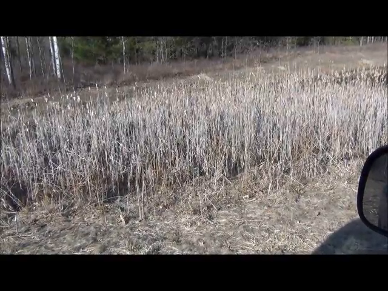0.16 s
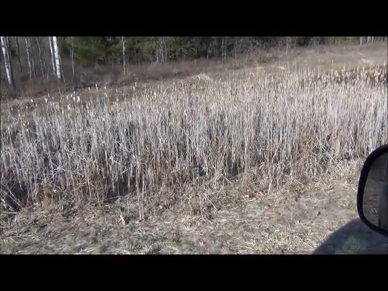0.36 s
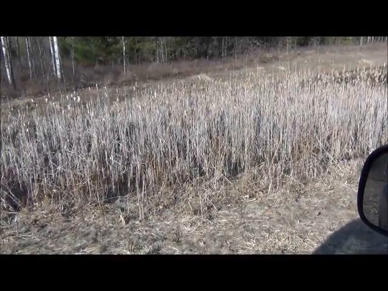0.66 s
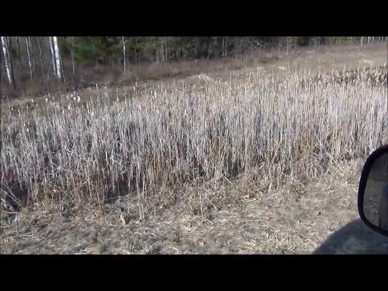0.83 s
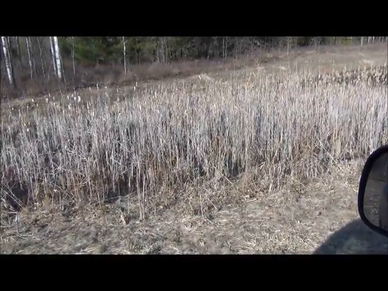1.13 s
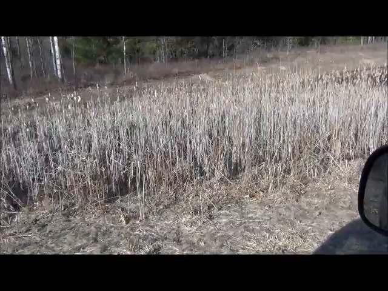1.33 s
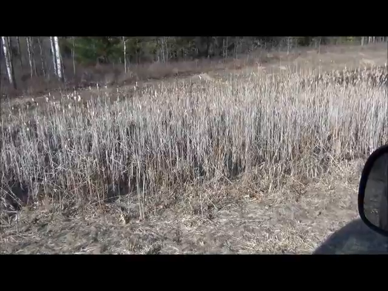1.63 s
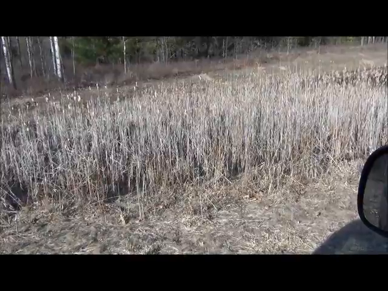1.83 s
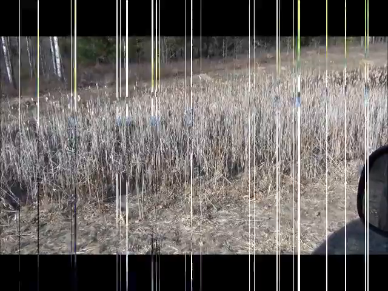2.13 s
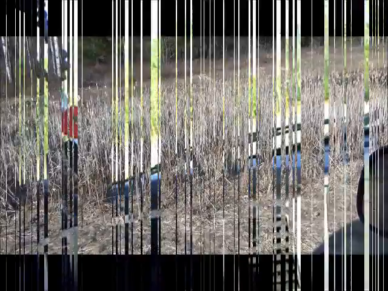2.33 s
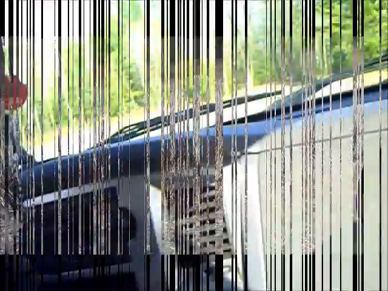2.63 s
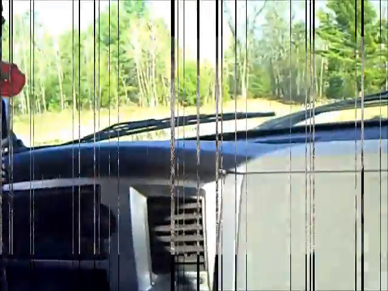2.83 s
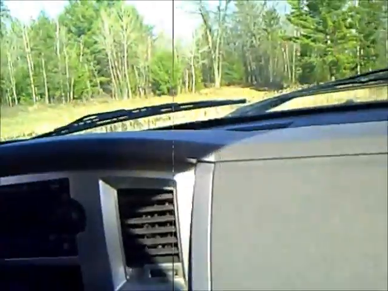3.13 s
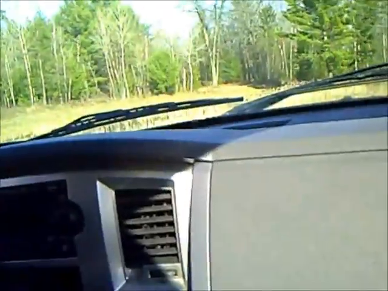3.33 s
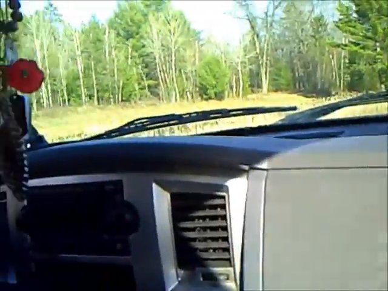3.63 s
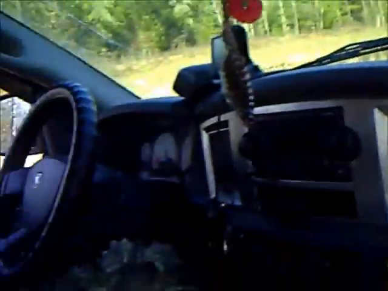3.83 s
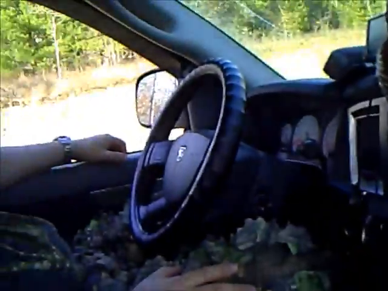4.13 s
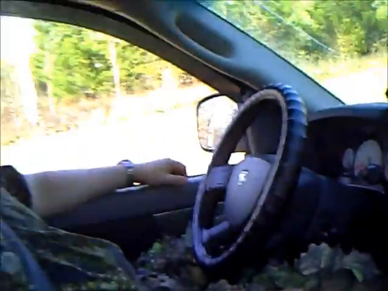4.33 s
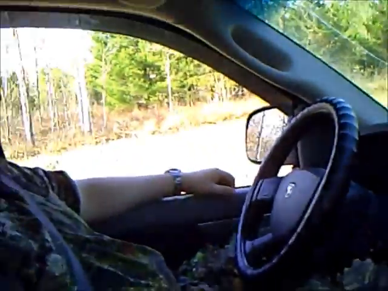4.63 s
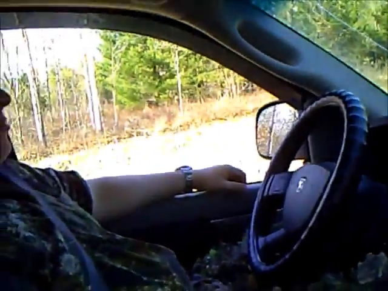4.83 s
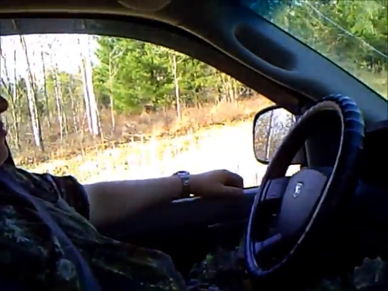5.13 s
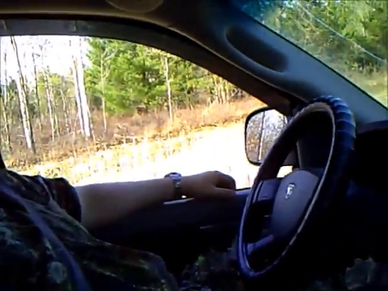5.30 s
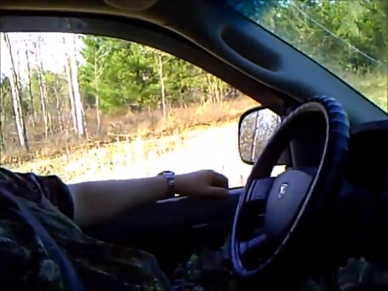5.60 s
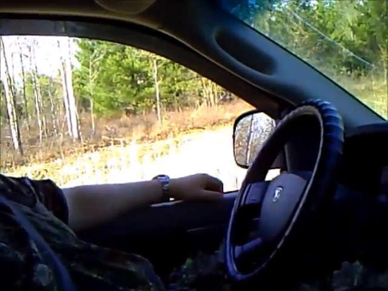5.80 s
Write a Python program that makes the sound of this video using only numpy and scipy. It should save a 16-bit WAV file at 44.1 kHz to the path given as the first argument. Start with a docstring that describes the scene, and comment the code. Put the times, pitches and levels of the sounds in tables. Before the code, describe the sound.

A small camera at a parked truck hears a bright, crowded peeper chorus with a thin outdoor echo and light hiss. An accelerating-in-loudness, climbing trill opens it, and another follows later. One hard click interrupts, then clothing brushes nearby. The sound suddenly drops to a quiet, narrow cab interior, where distant peeps remain faint beneath dull irregular handling taps and tiny creaks.

```python
"""In a cattail marsh, spring peepers call, heard with a small camera from a parked pickup.
Each peep is a rising harmonic glide from a vocal sac; trills are runs of tiny peeps, and birds whistle and chip.
Hundreds of overlapping peeps with decaying echoes blur into a crowd; filtered noise makes hiss and follows the calls.
An electrical step clicks, shaped noise makes cloth strokes, and filtered pulses make handling knocks.
After a faint buzz begins, the chorus drops abruptly and is heard faintly inside the cab, among soft knocks."""
import sys
import numpy as np
from scipy import signal
from scipy.fft import rfft, irfft
from scipy.io import wavfile
from scipy.ndimage import uniform_filter1d

SR = 44100
rng = np.random.default_rng(int(sys.argv[2]) if len(sys.argv) > 2 else 0)


def store_pcm(level_fs):
    """Save levels as 16-bit WAV."""
    pcm = np.round(np.clip(level_fs, -1, 1) * 32767).astype(np.int16)
    wavfile.write(sys.argv[1], SR, np.atleast_2d(pcm).T)


N = 262924
TIME = np.arange(N) / SR
CUT_S = 3.354  # the marsh gives way to the cab
PEEP_ARCH_HZ = 13.7  # peep glides flatten a little towards their end
# small frogs call higher, and each size sweeps at its own speed:
# (middle pitch [Hz], rise [Hz/s], overtone offset [dB])
FROG_SIZES = [(2740, 3750, -38.5), (2953, 3020, -29), (3018, 2435, -32.5), (3151, 3600, -30.5),
              (3354, 5700, -24), (3480, 4800, -33)]


def undb(db):
    """Logarithmic level: decibels become an amplitude ratio."""
    return 10 ** (np.asarray(db) / 20)


def unit(x):
    """Power normalization: scale to rms 1."""
    return x / np.sqrt(np.mean(x ** 2) + 1e-20)


def add(track, start_s, x):
    """Superposition: mix x into the track from start_s."""
    i = int(round(start_s * SR))
    x = x[max(-i, 0):max(N - i, 0)]
    track[max(i, 0):max(i, 0) + len(x)] += x


def colour(x, points):
    """Linear filtering: weight the spectrum by (frequency [Hz], gain [dB]) points."""
    point_hz, gain_db = np.transpose(points)
    hz = np.maximum(np.fft.rfftfreq(len(x), 1 / SR), 1)
    gain = undb(np.interp(np.log(hz), np.log(point_hz), gain_db))
    return irfft(rfft(x) * gain, len(x))


def noise(points):
    """Broadband noise: filtered Gaussian samples scaled to rms 1."""
    return unit(colour(rng.standard_normal(N), points))


def ring(x, hz, width_hz):
    """Resonance: one mode passes a band around its natural frequency."""
    b, a = signal.iirpeak(min(hz, .45 * SR), hz / width_hz, fs=SR)
    return signal.lfilter(b, a, x)


def wander(t, rate_hz):
    """Random modulation: Gaussian values, rate_hz of them a second, joined by lines."""
    points = rng.standard_normal(int(t[-1] * rate_hz) + 2)
    return np.interp(t * rate_hz, np.arange(len(points)), points)


def note(length_s, start_hz, end_hz, arch_hz, partials,
         edge_s=0.0049, waver_hz=10, shimmer_db=1.7, hook_hz=0):
    """Frequency modulation: a gliding harmonic tone of rms near 1, with an optional falling hook."""
    t = np.arange(int((length_s + edge_s / 2) * SR)) / SR
    u = t / length_s
    hz = start_hz + (end_hz - start_hz) * u + 4 * arch_hz * u * (1 - u)
    hz = hz + hook_hz * np.exp(-t / 0.0049) + waver_hz * wander(t, 260)
    phase = 2 * np.pi * np.cumsum(hz) / SR + 4 * np.pi * rng.random()
    edges = np.clip(np.minimum(t, t[-1] - t) / edge_s, 0, 1)
    swell = np.sin(np.pi / 2 * edges) ** 2
    tone = np.zeros(len(t))
    for multiple, db in partials:
        half = round(2 * multiple)
        flutter_db = 2.5 * wander(t, 320) if half != 2 else 0  # the main tone holds
        tone += undb(db + flutter_db) * np.sin(half / 2 * phase)
    return np.sqrt(2) * tone * swell * undb(shimmer_db * wander(t, 120))


def frog(overtone_db):
    """Source and resonator: the sac rings at twice the cord rate, and cord harmonics leak past it."""
    # tone of the sac: (multiple of the whistled pitch, relative level [dB])
    sac = [(1, 0), (2, -51)]
    # harmonics of the vocal cords: (multiple of the whistled pitch, relative level [dB])
    cords = [(.5, -2), (1.5, -2), (2, -13.5), (2.5, -18.5), (3, -20), (4, -25), (4.5, -26)]
    return sac + [(multiple, db + overtone_db) for multiple, db in cords]


def peeps(overtone_spread_db=1.5):
    """Size scaling: each nearer frog's peep is one upward glide whose steepness follows its pitch."""
    # peeps that stand out of the chorus: (time [s], length [s], middle pitch before the arch [Hz], level [dB])
    calls = [(0, 0.01, 3056, -23), (0, 0.029, 2819, -28), (0.051, .13, 2970, -33.5),
             (0.224, 0.081, 2958, -31), (.243, .04, 3490, -46), (0.308, 0.077, 3230, -42.5),
             (0.313, 0.063, 2948, -30), (.477, .11, 3000, -30), (.488, .077, 2734, -28),
             (0.599, 0.063, 3042, -29.5), (0.612, .13, 2998, -33.5), (.638, 0.073, 3162, -39.5),
             (0.738, .091, 2903, -40), (0.866, 0.08, 2928, -29), (0.917, 0.085, 2990, -34.5),
             (.95, 0.079, 2748, -28), (.954, 0.068, 2937, -32.5), (1.051, 0.059, 2750, -40),
             (1.111, 0.043, 3440, -45.5), (1.187, .06, 2706, -45), (1.252, 0.078, 2917, -33),
             (1.257, 0.074, 3233, -38), (1.267, 0.033, 2768, -29), (1.34, 0.1, 3015, -28.5),
             (1.357, 0.039, 3265, -38.5), (1.369, .1, 2786, -28), (1.496, 0.066, 2946, -29.5),
             (1.592, 0.043, 3476, -46), (1.627, 0.051, 3060, -43.5), (1.709, 0.063, 2780, -38),
             (1.782, 0.044, 2935, -31), (1.831, 0.081, 2768, -28), (1.887, 0.061, 3313, -38),
             (1.911, 0.044, 2990, -32), (1.938, 0.06, 3117, -36.5), (1.947, 0.11, 2997, -30.5),
             (1.99, 0.065, 2929, -32.5), (2.069, 0.049, 3445, -44.5), (2.161, 0.058, 2903, -31.5),
             (2.252, 0.083, 2882, -33.5), (2.339, 0.088, 2783, -26.5), (2.356, 0.053, 2933, -27.5),
             (2.426, 0.12, 2987, -33), (2.434, 0.082, 2813, -28), (2.547, 0.096, 3153, -34.5),
             (2.557, 0.038, 3490, -46), (2.598, .049, 3347, -37.5), (2.734, 0.1, 2994, -31.5),
             (2.81, 0.078, 2927, -29.5), (2.835, 0.073, 2760, -28.5), (2.901, .075, 2966, -31),
             (2.956, .08, 2930, -33.5), (3.049, 0.07, 3019, -32), (3.177, .043, 3275, -36.5),
             (3.189, 0.0696, 3015, -37.5), (3.202, 0.075, 3333, -37.5), (3.28, .072, 2904, -27.5),
             (3.388, 0.078, 2970, -48), (3.431, 0.04, 3224, -50.5), (3.512, 0.042, 2860, -55),
             (3.575, 0.014, 3060, -52), (3.613, 0.09, 2810, -60.5), (3.776, 0.038, 2730, -55.5),
             (3.957, 0.05, 3050, -47.5), (4.014, 0.036, 2880, -49.5), (4.116, .063, 2860, -55.5),
             (4.208, 0.059, 2735, -51), (4.301, 0.06, 2864, -49.5), (4.415, 0.076, 3150, -47.5),
             (4.56, 0.071, 2947, -51.5), (4.667, 0.066, 3320, -56.5), (4.69, 0.088, 2938, -55),
             (4.802, 0.068, 3125, -47), (4.813, 0.048, 2900, -52.5), (5.048, 0.048, 2900, -50),
             (5.136, 0.054, 2710, -52), (5.23, .045, 2900, -49.5), (5.281, 0.047, 3122, -42.5),
             (5.301, 0.041, 3410, -52.5), (5.48, 0.048, 2910, -47.5), (5.655, 0.056, 3116, -45),
             (5.754, 0.064, 2954, -52), (5.933, .034, 2857, -50.5)]
    out = np.zeros(N)
    pitches, rises, overtones = np.transpose(FROG_SIZES)
    for start_s, length_s, hz, db in calls:
        climb = np.interp(hz, pitches, rises) * length_s
        overtone_db = np.interp(hz, pitches, overtones) + overtone_spread_db * rng.standard_normal()
        peep = note(length_s, hz - climb / 2, hz + climb / 2, PEEP_ARCH_HZ, frog(overtone_db))
        add(out, start_s, undb(db) * peep)
    return out


def neighbours(count=6, low_hz=2760, high_hz=3290, period_s=.46, drift_s=.035, length_s=.06, spread_db=2.5):
    """Near-periodic calling: frogs at middle distance repeat about twice a second, each near its own pitch."""
    out = np.zeros(N)
    pitches, rises, _ = np.transpose(FROG_SIZES)
    for own_hz in np.linspace(low_hz, high_hz, count):
        climb, first = np.interp(own_hz, pitches, rises) * length_s, rng.random()
        for k, (late, off, loud) in enumerate(rng.standard_normal(size=(16, 3))):
            hz = own_hz + 25 * off
            peep = note(length_s, hz - climb / 2, hz + climb / 2, PEEP_ARCH_HZ, frog(overtone_db=-29.5))
            start_s = (k + first - 1) * period_s + drift_s * late
            add(out, start_s, undb(spread_db * loud) * peep)
    return out


def scatter(x, t60_s, wet_db):
    """Reverberation: reeds, trees and the truck return a thin, exponentially decaying tail."""
    t = np.arange(SR // 2) / SR
    decay = undb(-60 * t / t60_s)
    tail = rng.standard_normal(len(t)) * decay * (t > .006)  # first echo after 6 ms
    return undb(wet_db) * signal.fftconvolve(x, tail / np.linalg.norm(tail))[:N]


def crowd(count=560, spread_db=2.5):
    """Superposition and scattering: hundreds of peeps of varied pitch and level blur through the reeds."""
    out = np.zeros(N)
    for k, (when, pitch, span, rise) in enumerate(rng.random((count, 4))):
        hz = 2480 + 880 * pitch
        end_hz = hz + 110 + 160 * rise
        peep = note(.04 + 0.046 * span, hz, end_hz, 9.6, frog(overtone_db=-34.5))
        start_s = (k + when) / count * (N / SR + .1) - .1
        add(out, start_s, undb(spread_db * rng.standard_normal()) * peep)
    return undb(-7.5) * out + scatter(out, t60_s=.25, wet_db=1.5)


def following_noise(x, level_db):
    """Envelope modulation: faint noise, mostly around the peeps' pitch, rises and falls with the chorus."""
    loudness = np.sqrt(np.abs(uniform_filter1d(x ** 2, size=500)))
    flutter = undb(3 * np.clip(wander(TIME, 110), -1.6, 1.6))
    skirt = noise([(200, -15.5), (1150, -16.5), (1500, -1.5), (1900, 0.5), (2500, 8), (3400, -2),
                   (3900, -4.5), (4500, 0.0), (5200, -25.5), (9000, -17.5), (12000, -36)])
    return undb(level_db) * loudness * flutter * skirt


def open_marsh(near, middle, far):
    """Spectral and level shaping: calls over the marsh, the farther ones swelling and ebbing."""
    # colour of the crowd over the marsh: (frequency [Hz], relative level [dB])
    crowd_colour = [(2400, -13), (2650, -7), (2850, -2), (3050, 2.5), (3200, -12), (3400, -14.5),
                    (3700, -13.5), (4300, -2), (6000, -5)]
    # swell of the farther frogs: (time [s], relative level [dB])
    swell = [(0.0, -31.5), (0.53, -32), (0.67, -37), (1.09, -37.5), (1.93, -36), (2.04, -40), (2.25, -39),
             (2.39, -33), (2.81, -34), (2.94, -34), (3.19, -34), (3.25, -36)]
    chorus = undb(-5.0) * unit(colour(far, crowd_colour)) + undb(-6.5) * colour(middle, crowd_colour)
    return near + chorus * undb(np.interp(TIME, *np.transpose(swell)))


def heard_outside(marsh):
    """Superposition: direct calls, echoes and a faint noise that follows them add to a steady hiss."""
    # still air and microphone hiss: (frequency [Hz], relative level [dB])
    air = [(25, 0), (90, 1), (200, -5), (500, -4), (1000, -8.5), (2000, -3), (4000, -8.5), (8000, -20.5),
           (15000, -25)]
    hiss = undb(-61) * noise(air)
    echoes = scatter(marsh, t60_s=0.45, wet_db=-12.0)
    return marsh + echoes + following_noise(marsh, level_db=-29.5) + hiss


def birds():
    """Frequency glides: whistles, some steady, some hooked and quavering, and short bright chips."""
    # low whistles: (nominal time [s], length [s], start [Hz], end [Hz], arch [Hz],
    # level before the partials' gain [dB], quaver [0-1])
    whistles = [(0.883, 0.084, 2176, 2103, -42, -56.5, 0.14), (2.076, 0.063, 2170, 2097, -15, -59, 0.1),
                (2.47, 0.076, 2160, 2210, -42, -63, 0.3), (2.77, 0.066, 2150, 2107, -34, -58, 0.2),
                (2.957, 0.092, 2180, 2096, -21, -65.5, 0.3), (3.956, .12, 2390, 2350, -13, -63.5, 0.96),
                (4.41, 0.14, 2360, 2480, -53, -64, 1), (4.87, 0.092, 2446, 2390, -40, -59.5, 0.87),
                (5.442, 0.12, 2364, 2378, 3, -57.5, 0.92), (5.79, 0.19, 2260, 2450, 47, -65, 0.9)]
    # sharp falling chips: (time [s], length [s], start [Hz], end [Hz], arch [Hz],
    # level before the partials' gain [dB])
    chips = [(0.052, 0.037, 1890, 1714, -10, -56.5), (0.591, 0.043, 1858, 1713, 9, -57),
             (1.053, 0.04, 1864, 1750, -10, -58), (2.321, 0.037, 1857, 1756, -11, -58),
             (2.913, 0.041, 1830, 1754, 9, -57), (3.535, 0.018, 1790, 1690, 2, -73),
             (4.978, 0.017, 1730, 1650, -2, -73), (5.564, 0.02, 1820, 1770, 6, -78)]
    # partials of either voice: (multiple of the whistled pitch, gain [dB])
    whistle_tone = [(1, 7.5), (2, -43)]
    chip_tone = [(1, 1.5), (2, 4.5), (3, -9.5), (4, -8.5), (5, -14.5), (6, -15.5)]
    out = np.zeros(N)
    for start_s, *glide, db, quaver in whistles:
        whistle = note(*glide, whistle_tone, edge_s=0.0076, waver_hz=32 * quaver,
                       shimmer_db=4.4 * quaver, hook_hz=240 * quaver)
        add(out, start_s - .002, undb(db) * whistle)
    for start_s, *glide, db in chips:
        add(out, start_s, undb(db) * note(*glide, chip_tone))
    return out


def trills(slowing=.15, pulse_s=.016, lead_s=.003):
    """Pulse train: tiny peeps slow, climb and grow as the sac fills."""
    # trilling frogs: (nominal time [s], first to last pulse [s], pulses [count], start [Hz], end [Hz],
    # start level [dB], end level [dB])
    runs = [(.06, .399, 16, 2416, 2866, -42.5, -23.5), (1.531, 0.24, 10, 2688, 2880, -39.5, -31.5),
            (3.086, .25, 10, 2603, 2766, -44, -41)]
    out = np.zeros(N)
    for start_s, length_s, count, start_hz, end_hz, start_db, end_db in runs:
        for u in np.linspace(0, 1, int(round(count))):
            effort = np.sin(np.pi / 2 * u ** 1.6) ** 2
            hz = start_hz + (end_hz - start_hz) * effort
            db = start_db + (end_db - start_db) * u ** 1.7
            pulse = note(pulse_s, hz - 20, hz + 20, 0, frog(overtone_db=-31.0))
            pulse_start_s = start_s - lead_s + length_s * u * (1 - slowing * (1 - u))
            add(out, pulse_start_s, undb(db) * pulse)
    return out


def click(start_s=1.8632, gain=0.36, rise_s=0.00011, decay_s=0.0029, rebound=0.015, rebound_s=0.24,
          crack_db=-33, crack_s=0.035):
    """Transient response: an electrical step drops, leaks away, rebounds slowly and leaves a short hiss."""
    out, t = np.zeros(N), np.arange(SR) / SR
    leak = rebound * np.exp(-t / rebound_s) - np.exp(-t / decay_s)
    step = (1 - np.exp(-t / rise_s)) ** 2 * leak
    hiss = noise([(300, -2), (800, -2.0), (1500, 6.5), (5000, -5.5), (10500, -5.0), (11600, -31)])[:SR]
    add(out, start_s, gain * (step + undb(crack_db) * hiss * np.exp(-t / crack_s)))
    return out


def rustle(swish_db=1.0, body_db=5.5, grain_db=2.5):
    """Friction noise: each cloth stroke follows a bell curve, a bright swish over a duller body."""
    # clothing near the camera: (middle [s], full width at 1/e [s], relative swish level [dB],
    # relative body-to-swish level [dB])
    strokes = [(1.875, 0.023, -44.5, -5.5), (1.992, 0.16, -57.5, -6.5), (2.11, 0.062, -57.5, -0.5),
               (2.178, 0.089, -56.5, -8), (2.288, 0.094, -59, -2), (2.436, 0.082, -52.5, -2.5),
               (2.581, 0.062, -58.5, 1), (2.726, 0.094, -57, -1.5), (2.819, 0.043, -73.5, 14),
               (2.958, 0.096, -69, 5.5), (3.22, 0.38, -68.5, -2.5), (3.814, 0.24, -75, 1),
               (4.07, 0.31, -71.5, 4), (4.348, 0.017, -68.5, 1), (4.492, .045, -66, 4),
               (4.659, .035, -69, 2)]
    # colours of the swish and of the body: (frequency [Hz], relative level [dB])
    swish_colour = [(2000, -12), (3500, -3.5), (5500, -3), (6500, -5), (7800, -1), (10300, -8.5),
                    (11200, -18.5), (12500, -41.5)]
    body_colour = [(60, -9), (320, -1), (500, -8), (750, -8.5), (1300, 3.5), (1800, -4.5), (3000, 1.5),
                   (6000, -35.5)]
    swish, body = np.zeros(N), np.zeros(N)
    for middle_s, length_s, db, rel_db in strokes:
        stroke = undb(db) * np.exp(-(2 * (TIME - middle_s) / length_s) ** 2)
        swish += stroke
        body += undb(rel_db) * stroke
    bright = undb(swish_db) * swish * noise(swish_colour)
    dull = undb(body_db) * body * noise(body_colour)
    return (bright + dull) * undb(grain_db * wander(TIME, 200))


def handling(push_s=0.0033, knock_db=-2.0, rattle_db=-11, case_hz=1300,
             thump_hz=210, thump_s=0.0028, thump_db=-5, lead_s=0.00358):
    """Impulse excitation: fingers push and release the case, and small things tick and creak."""
    # soft knocks of fingers on the camera body: (nominal time [s], relative level [dB])
    knocks = [(3.444, -50.5), (3.476, -54), (3.699, -54.5), (3.761, -55), (3.963, -54), (4.062, -49),
              (4.123, -51), (4.246, -51), (4.335, -49.5), (4.363, -52), (4.425, -51.5), (4.46, -52.5),
              (4.531, -51), (4.592, -51.5), (4.662, -51), (4.727, -51.5), (4.795, -52), (4.871, -50.5),
              (4.93, -52.5), (4.976, -55.5), (5.067, -48), (5.134, -51), (5.196, -51), (5.295, -49),
              (5.393, -48.5), (5.533, -49), (5.741, -48), (5.897, -51)]
    # small dry ticks and creaks, each through two equal resonances:
    # (time [s], peak [dB], centre [Hz], width of either resonance [Hz], decay of the excitation [s])
    ticks = [(2.065, -39, 910, 900, 0.0008), (2.085, -34, 1090, 1400, 0.001),
             (2.277, -35, 1070, 900, 0.0038), (3.244, -44, 12000, 3540, 0.0011),
             (3.703, -47, 603, 360, 0.017), (3.732, -50, 940, 423, 0.014),
             (4.104, -46.5, 1280, 1200, 0.0029)]
    out, t = np.zeros(N), np.arange(SR // 10) / SR
    case = signal.butter(2, case_hz, fs=SR)
    after = np.maximum(t - .01, 0)  # the release comes 10 ms in
    for start_s, db in knocks:
        u = (t - .01) / (push_s * rng.uniform(.7, 1.4))
        push = np.sign(u) * np.exp(-np.abs(u))  # strain builds up, then snaps over
        rattle = unit(ring(rng.standard_normal(len(t)), 420, 770)) * np.exp(-np.abs(u) / 1.8)
        thump = np.sin(2 * np.pi * thump_hz * after) * np.exp(-after / thump_s)
        knock = signal.lfilter(*case, push + undb(thump_db) * thump + undb(rattle_db) * rattle)
        add(out, start_s - lead_s, undb(db + knock_db) * knock)
    for start_s, db, hz, width_hz, decay_s in ticks:
        burst = rng.standard_normal(len(t)) * np.exp(-t / decay_s)
        tick = ring(ring(burst, hz, width_hz), hz, width_hz)
        add(out, start_s, undb(db) * tick / np.abs(tick).max())
    return out


def buzz(hz=311, start_s=3.2, length_s=0.23, db=-69):
    """Harmonic synthesis: four unsteady partials make a faint, brief buzz."""
    out = np.zeros(N)
    partials = [(1, 0), (2, -6.5), (3, -1), (4, -6.5)]
    tone = note(length_s, hz, hz, 0, partials, edge_s=0.045, waver_hz=11.2, shimmer_db=3)
    add(out, start_s, undb(db) * tone)
    return out


def inside_cab(near, middle, far):
    """Filtering and random level modulation: faint calls with an uneven, fluttering level; from the scene
    change on, little sounds above 11 kHz."""
    # colour of the crowd inside the cab: (frequency [Hz], relative level [dB])
    crowd_colour = [(1500, 3), (2450, -11), (2650, -9), (2850, 1), (3050, -2), (3200, -6.5), (3430, -1),
                    (3700, -6), (4400, -19), (6000, -19), (12000, -26)]
    # swell of the farther frogs: (time [s], relative level [dB])
    swell = [(3.38, -56.5), (3.46, -62), (3.8, -60.5), (4.64, -53), (4.83, -54.5), (5.1, -54),
             (5.31, -51.5), (5.95, -52.5)]
    # top cut of the calls: (frequency [Hz], gain [dB])
    top_cut = [(3000, 0), (6000, -3), (10000, -3), (12000, -22.5)]
    # still air and microphone hiss: (frequency [Hz], relative level [dB])
    air = [(25, 2), (100, -2.5), (300, -10.5), (700, -19.5), (1300, -18), (1900, -16), (4000, -21),
           (7500, -29), (8300, -26), (8700, -17), (9100, -30), (10800, -25), (11500, -55)]
    chorus = undb(-1.5) * unit(colour(far, crowd_colour)) + undb(-1.6) * colour(middle, crowd_colour)
    calls = near * (TIME > CUT_S + .02) + chorus * undb(np.interp(TIME, *np.transpose(swell)))
    calls = colour(calls, top_cut) * undb(2.36 * wander(TIME, 170))
    hiss = undb(-68) * noise(air)
    echoes = scatter(calls, t60_s=0.22, wet_db=-17.5)
    return calls + echoes + following_noise(calls, level_db=-24.5) + hiss


def scene():
    """Mid-side superposition: the open marsh, then the cab; echoes give the marsh a slight width."""
    outside = np.clip((CUT_S - TIME) / .002, 0, 1)
    near, middle, far = peeps() + trills() + birds(), neighbours(), crowd()
    marsh = open_marsh(near * outside, middle, far)
    places = outside * heard_outside(marsh) + (1 - outside) * inside_cab(near, middle, far)
    mid = places + click() + handling() + rustle() + buzz()
    side = outside * (scatter(marsh, t60_s=.05, wet_db=-13.5) + .025 * marsh)
    return np.array([mid + side, mid - side])


def record(dry):
    """Band limiting: the camera's steep elliptic low-pass removes the top above 15.7 kHz."""
    low_pass = signal.ellip(8, .2, 70, 15700, fs=SR, output="sos")
    return signal.sosfilt(low_pass, dry)


dry = scene()
out = record(dry)
store_pcm(out)
```